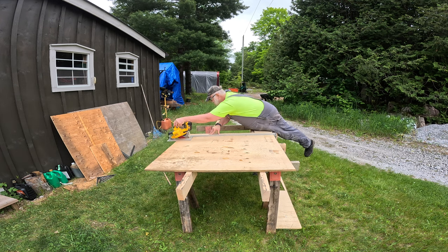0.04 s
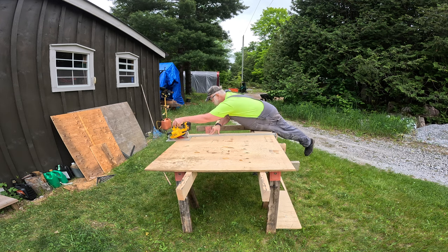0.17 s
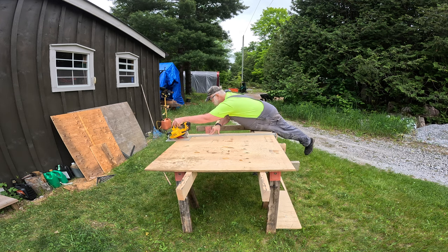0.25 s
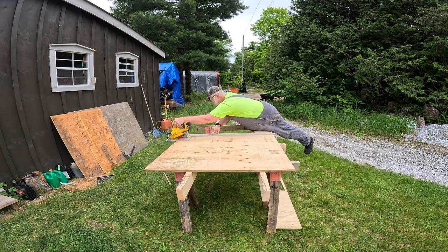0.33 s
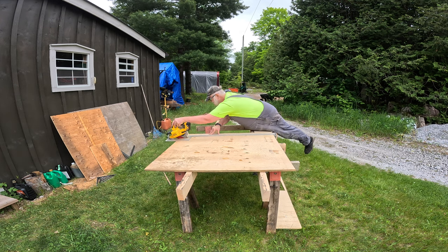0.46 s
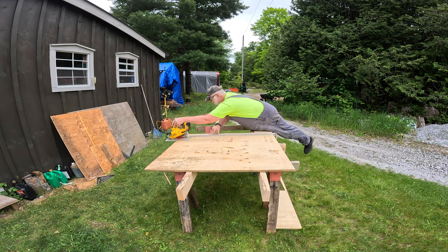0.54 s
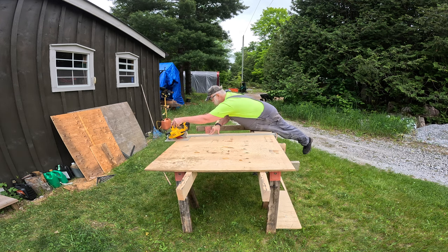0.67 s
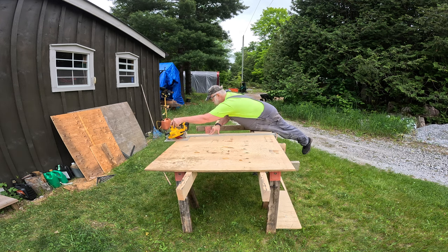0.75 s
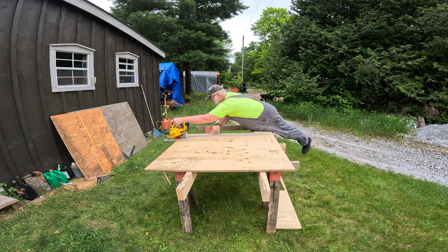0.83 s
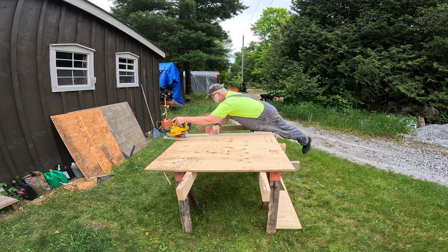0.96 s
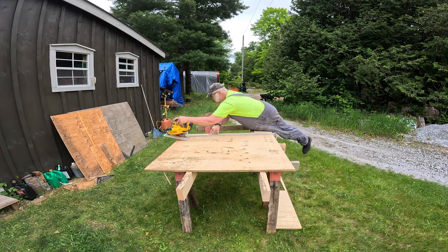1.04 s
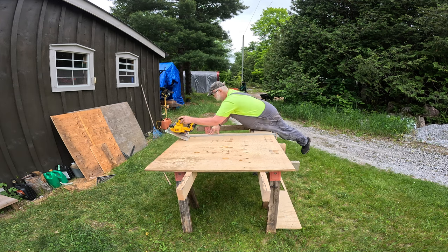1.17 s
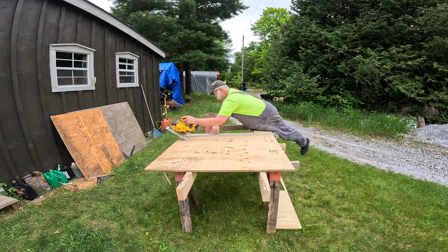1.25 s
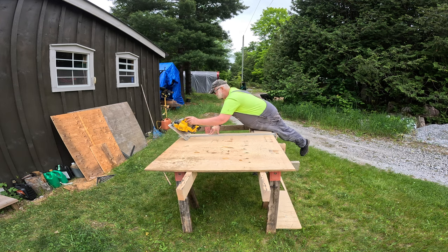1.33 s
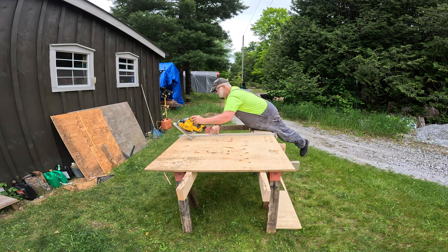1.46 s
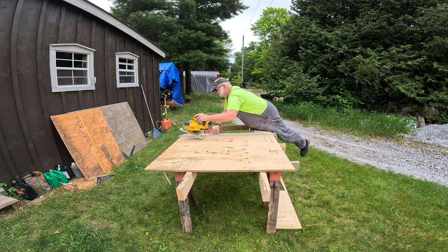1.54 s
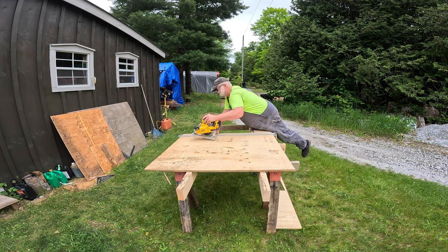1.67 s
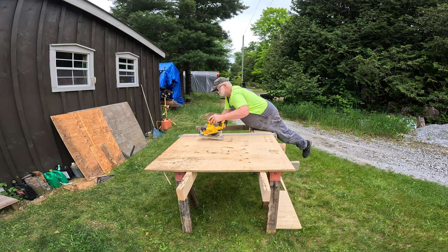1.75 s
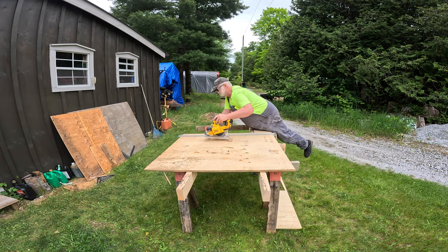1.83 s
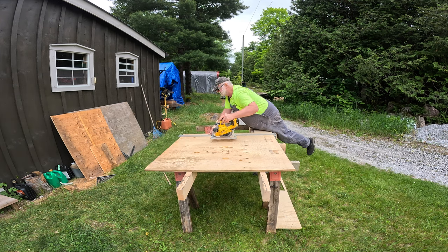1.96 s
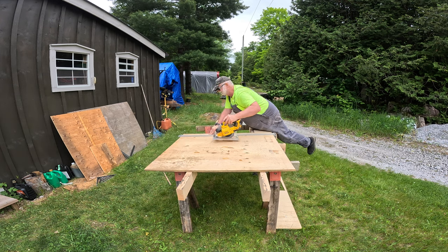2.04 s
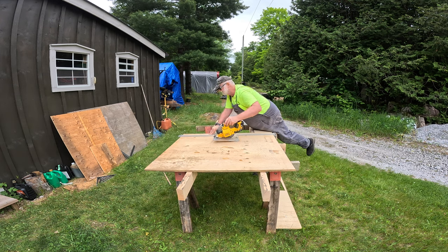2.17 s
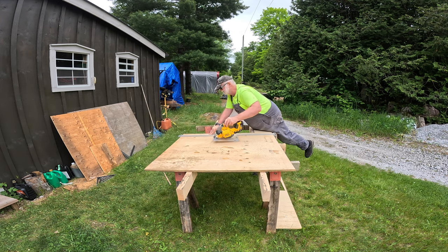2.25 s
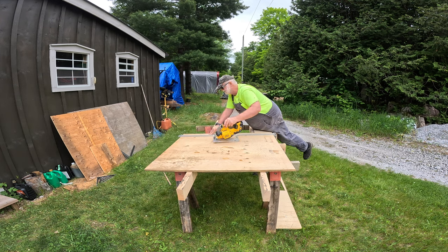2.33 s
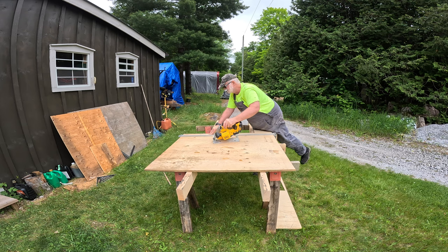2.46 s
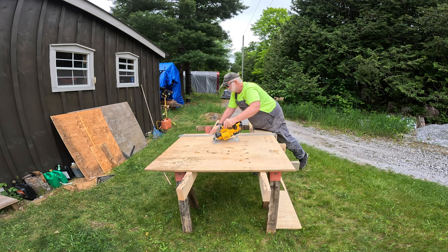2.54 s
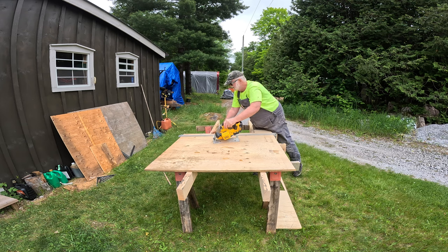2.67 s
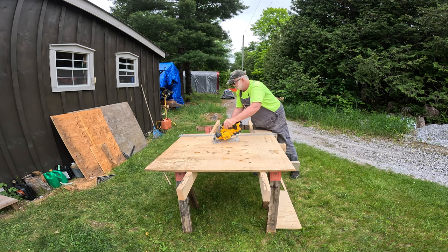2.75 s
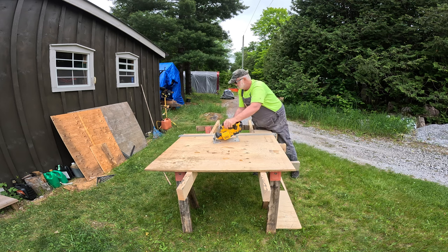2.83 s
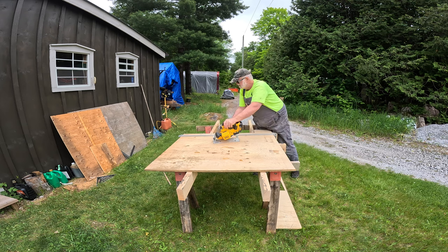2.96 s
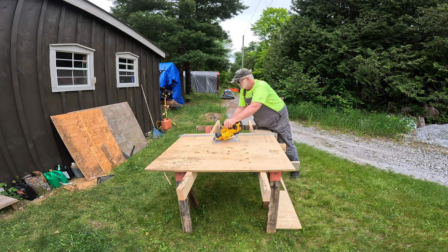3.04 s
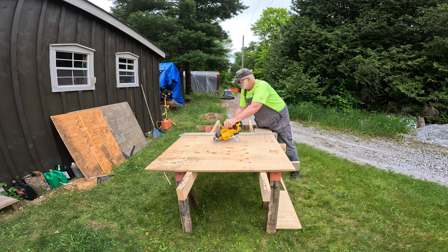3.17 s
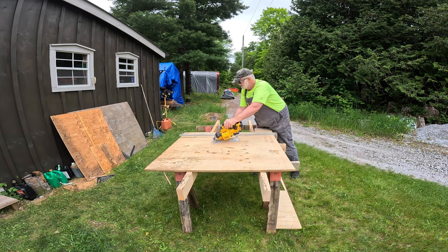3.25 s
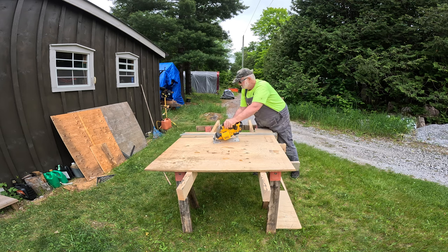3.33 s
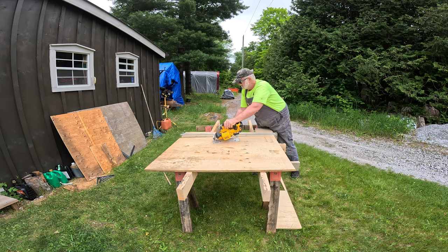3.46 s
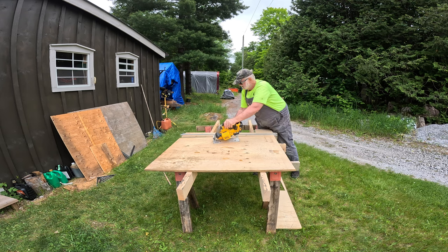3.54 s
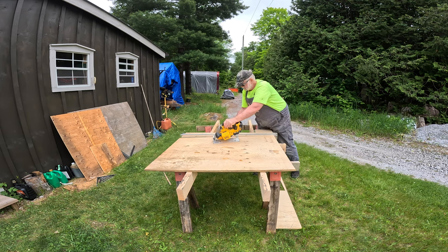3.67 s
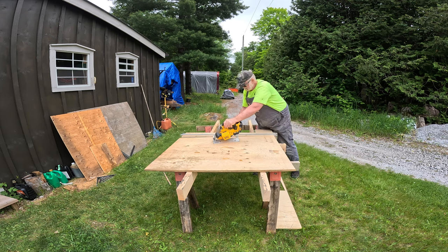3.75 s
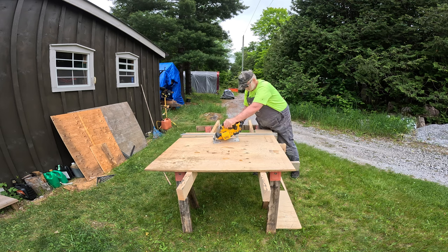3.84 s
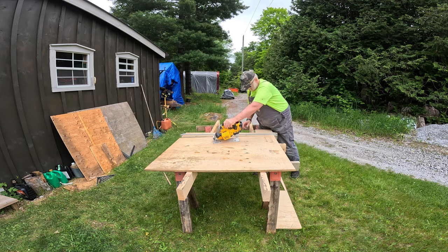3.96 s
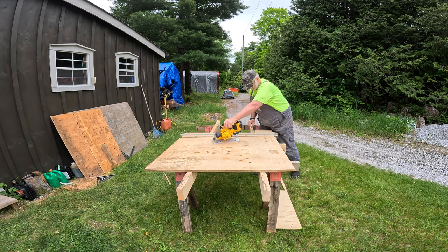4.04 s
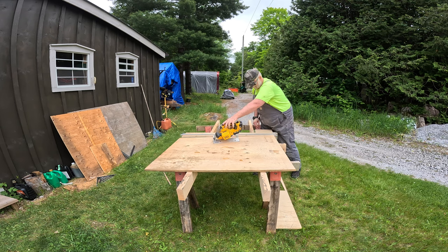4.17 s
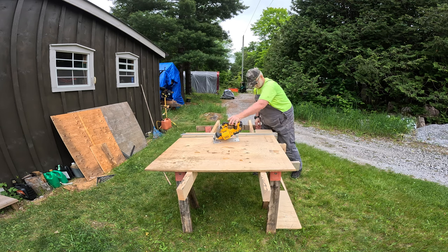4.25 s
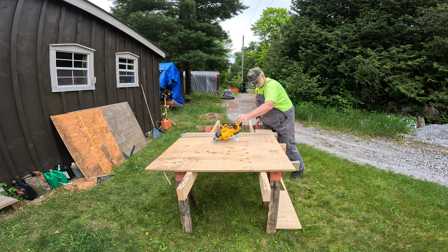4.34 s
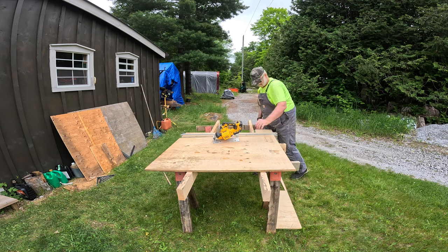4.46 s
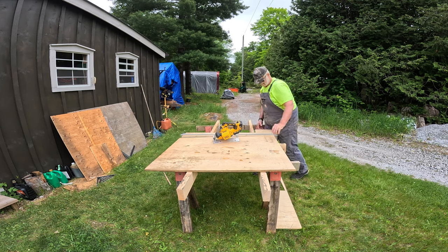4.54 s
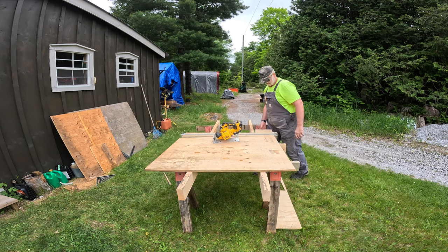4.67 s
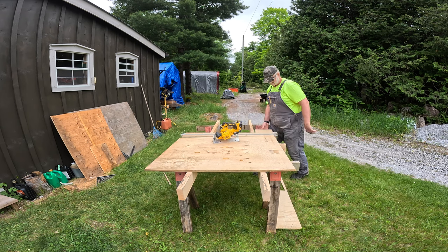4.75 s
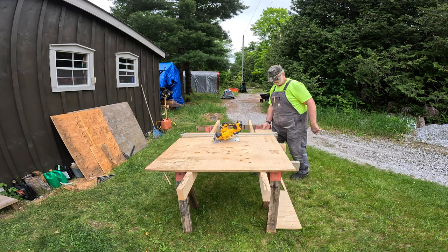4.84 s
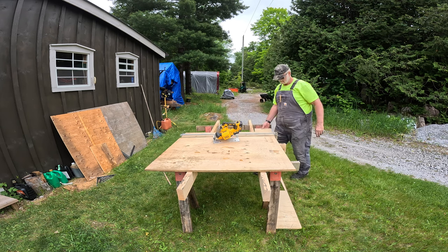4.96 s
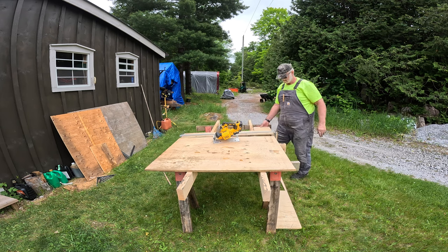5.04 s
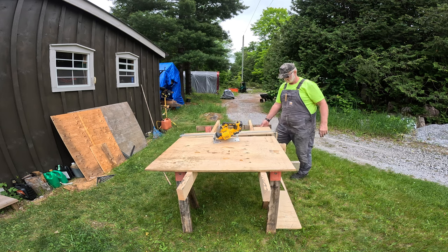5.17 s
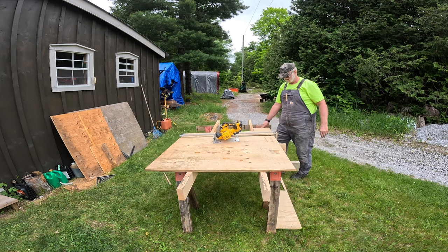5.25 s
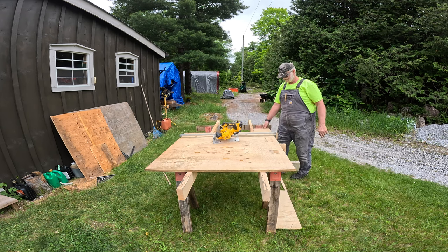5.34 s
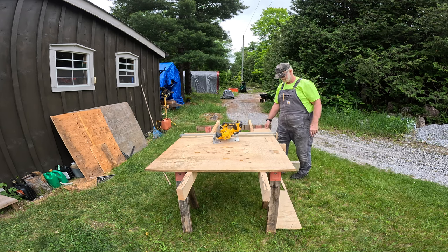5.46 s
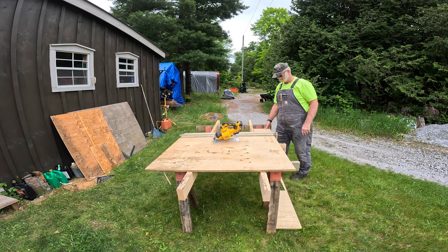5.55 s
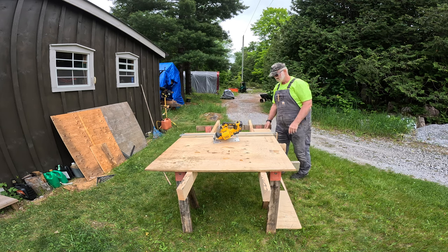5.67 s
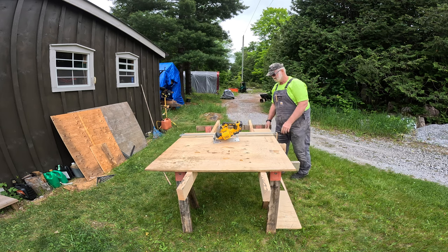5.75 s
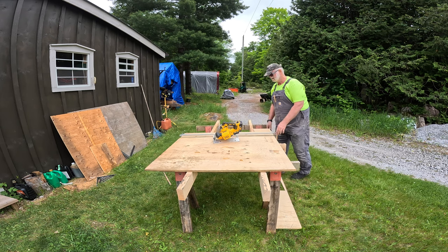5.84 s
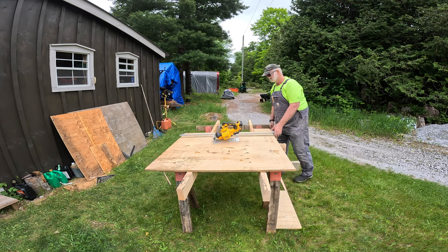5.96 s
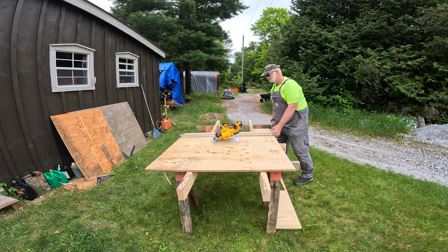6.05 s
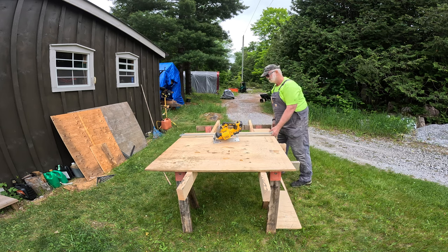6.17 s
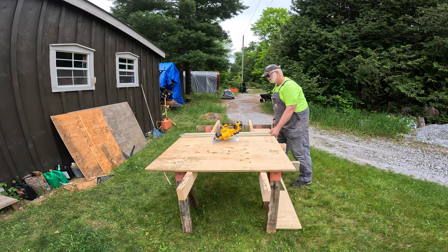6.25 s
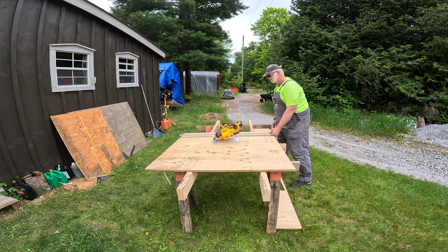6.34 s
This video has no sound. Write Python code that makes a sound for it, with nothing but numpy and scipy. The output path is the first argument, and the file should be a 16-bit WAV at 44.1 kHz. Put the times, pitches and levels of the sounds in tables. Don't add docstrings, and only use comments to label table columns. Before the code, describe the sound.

Outdoors, a power saw winds down within a second, followed by taps, scrapes and thumps on a wooden sheet, a brief bird call and falling wood.

```python
import sys
import numpy as np
from scipy import signal
from scipy.fft import rfft, irfft
from scipy.io import wavfile
from scipy.ndimage import uniform_filter1d

SR = 44100
rng = np.random.default_rng(int(sys.argv[2]) if len(sys.argv) > 2 else 0)


def to_wav(s):
    ch = np.atleast_2d(s).T
    pcm = np.round(np.clip(ch, -1, 1) * 32767)
    wavfile.write(sys.argv[1], SR, pcm.astype(np.int16))


def convert_level_to_amplitude(level_db):
    exponent = np.asarray(level_db, float) / 20
    return 10 ** exponent


N = 282240

# (frequency [Hz], density [dB per Hz])
HISS = [(180, -18), (300, -8), (886, -4), (1020, 1), (1360, -1.5), (1490, -3), (2870, -6.5), (3950, -11.5),
        (5280, -12.5), (7280, -15), (9430, -22.5), (11500, -37), (15000, -66.5), (22000, -120)]
# (time [s], level [dB])
WIND = [(0, -60), (.5, -59), (.9, -62), (1.2, -52), (1.6, -48.5), (1.9, -47.5), (2.15, -60.5), (2.3, -47),
        (2.8, -50), (3.4, -52), (3.75, -46), (4.2, -50.5), (4.65, -53), (5.0, -48.5), (5.3, -61.5),
        (5.52, -52), (5.75, -63.5), (6.4, -61.5)]
# (delay [s], left level [dB], right level [dB])
ECHOES = [
    (.009, -15, -9),
    (0.022, -12, -18.5),
    (0.041, -26, -19.5),
]
# (frequency [Hz], left minus right [dB])
LEFT_MORE = [(60, -.1), (130, -.4), (250, -.7), (600, -1.5), (1400, -.7), (2800, .1), (6000, .1),
             (9500, 2.2), (13000, 4.5)]
# (frequency [Hz], left lead [rad])
LEFT_LEAD = [(100, 0), (350, -.06), (700, -.2), (1400, -0.16), (2800, -.28), (4600, -0.09), (9000, .15)]

# (time [s], pitch [Hz], level [dB])
NOTES = [
    [(3.715, 4270, -70), (3.752, 4230, -68), (3.762, 4190, -61), (3.78, 4430, -59), (3.814, 4540, -61),
     (3.83, 4720, -57), (3.848, 4940, -60), (3.857, 4950, -72)],
    [(3.864, 4960, -64), (3.875, 5030, -59), (3.895, 4930, -61), (3.915, 4680, -61), (3.935, 4100, -63),
     (3.955, 3600, -62), (3.968, 3440, -66)],
    [(3.965, 3420, -65), (4.0, 3420, -66), (4.03, 3520, -65), (4.058, 3540, -66), (4.07, 3700, -69),
     (4.125, 3720, -68)],
    [(3.9, 4950, -68), (3.94, 4940, -63), (3.975, 4850, -70), (4.02, 4850, -76)],
    [(4.188, 3650, -70), (4.198, 3633, -61), (4.228, 3616, -63), (4.238, 3620, -70)],
    [(5.96, 4170, -76), (5.968, 4165, -68), (6.0, 4160, -72), (6.03, 4160, -80), (6.066, 4150, -80),
     (6.076, 4167, -73), (6.105, 4160, -82), (6.15, 4185, -78), (6.165, 4180, -86)],
]
OCTAVE_DB = [-40, -40, -31, -40, -5, -40]
# (time [s], centre [Hz], level [dB])
BUZZ = [
    (3.95, 4200, -72),
    (4.02, 4500, -61),
    (4.07, 4800, -57),
    (4.12, 4500, -59),
    (4.16, 4500, -72),
]

# (frequency [Hz], level [dB], decay t60 [s])
EDGES = [(3630, 9, 0.0019), (4180, 7.5, 0.0025), (4850, 5.5, 0.0043), (5420, 3.5, 0.0064),
         (5930, -4.5, 0.0063)]
# (frequency [Hz], level [dB], decay t60 [s])
SHEET = [(90, -2, 0.75), (115.4, -2, 0.35), (168.7, 12.5, 0.08), (210.6, 8.5, 0.089), (249, 1.5, 0.14),
         (278.5, 2.5, 0.15)]
# (frequency [Hz], level [dB], decay t60 [s])
BODY = [(497, -54, 0.041), (578, 3.5, 0.028), (721, 4.5, 0.038), (813, 5, 0.015), (960, -20, 0.019),
        (1010, 9, 0.015), (1133, 9, 0.013), (1402, 13.5, 0.0079), (1690, 16.5, 0.0073), (1974, 9.5, 0.011),
        (2308, 3.5, 0.031), (2640, 2.5, 0.03), (3030, 3.5, 0.045)]
# (start [s], length [s], rub [dB], rumble [dB], hiss [dB])
SLIDES = [(0.96, 0.14, -58.5, -69, -76), (1.15, 0.036, -48.5, -39.5, -66), (1.753, 0.078, -42.5, -38, -50),
          (1.889, 0.23, -38, -27, -57), (2.678, 0.11, -48, -49, -63), (2.847, 0.099, -48.5, -43, -73),
          (2.986, 0.204, -55, -65, -84), (3.195, 0.12, -61, -74, -71), (3.61, 0.037, -43, -41, -54.5),
          (5.165, 0.58, -48.5, -46.5, -64), (5.771, 0.05, -72.5, -86, -66), (6.216, 0.083, -70, -67, -74)]
# (time [s], centre [Hz], level [dB])
SCRAPE = [(1.81, 5075, -75), (1.82, 4656, -45), (1.845, 5230, -52), (1.865, 5360, -87), (1.89, 5000, -56),
          (1.935, 5190, -46.5), (1.975, 4800, -48), (2.01, 4510, -52), (2.03, 5140, -53), (2.06, 5200, -57),
          (2.11, 5200, -58.5), (2.135, 5200, -71)]
# (time [s], level [dB], decay t60 [s])
SPIT = [(.66, -62, 0.037), (0.901, -62, .06), (1.011, -56.5, 0.052), (1.271, -59.5, 0.11),
        (1.411, -58, .08), (1.767, -48.5, 0.18), (2.151, -64, .05), (2.178, -58, .04), (2.187, -57, .04),
        (2.205, -48, .06), (2.247, -43.5, 0.043), (2.288, -65, .05), (2.538, -62.5, .05),
        (2.702, -58, 0.17), (2.877, -55.5, .12), (3.629, -56, .15), (3.668, -47.5, 0.045),
        (3.689, -50, 0.096), (5.122, -53.5, 0.13), (5.147, -61, .06), (5.183, -64.5, .06),
        (5.222, -59.5, .06), (5.288, -57, .06), (5.345, -62.5, 0.059), (5.397, -48, 0.061),
        (5.465, -66, .05), (1.89, -70, 0.56), (5.16, -71, .9), (5.3, -68.5, 0.36), (5.41, -66, 0.29),
        (2.21, -62, 0.2)]
# (time [s], peak [dB], centre [Hz],
# crack [dB])
TAPS = [(0.659, -25, 1040, -44), (0.9, -33, 1980, -59), (0.912, -35.5, 1140, -44), (1.011, -31, 1380, -70),
        (1.036, -40, 980, -44.5), (1.098, -37, 1170, -81), (1.176, -31.5, 1740, -58),
        (1.27, -12.5, 1210, -45.5), (1.315, -24.5, 950, -82), (1.41, -20, 1030, -64),
        (1.429, -23, 1410, -62), (1.467, -35, 1400, -64), (1.63, -41, 1200, -74), (1.673, -28, 1630, -40),
        (1.818, -17, 1010, -39), (1.9, -24, 2060, -57), (1.936, -14, 930, -50), (2.15, -30.5, 1771, -46.5),
        (2.177, -30, 2600, -46), (2.183, -26, 1390, -44), (2.441, -40, 2400, -54), (2.412, -46, 2800, -56),
        (2.247, -30, 2600, -50), (1.766, -30, 2600, -48), (1.969, -30, 2000, -40), (4.268, -47, 2000, -56),
        (2.555, -40, 2400, -54), (2.699, -35, 1420, -49.5), (2.875, -32, 1180, -50),
        (3.297, -37, 2010, -51.5), (3.564, -36.5, 1110, -66), (4.119, -36.5, 2170, -50),
        (4.243, -32, 1900, -55), (6.238, -43, 1106, -68), (4.568, -39, 1020, -56.5),
        (3.629, -31, 1270, -54), (3.667, -11, 1350, -45)]
# (time [s], peak [dB], sheet thump [dB], crack [dB], rattle t60 [s])
LANDINGS = [(1.217, -40, -59, -55.5, 0.074), (1.505, -29.5, -45, -52, 0.1), (1.541, -36, -46, -57, 0.049),
            (1.837, -22, -32, -70, 0.089), (2.197, -14, -26, -35.5, 0.29), (2.204, -10, -24, -66, 0.04),
            (2.213, -38, -17, -53, 0.079), (2.247, -61, -33, -39.5, 0.12), (2.289, -64, -29.5, -55, 0.35),
            (2.539, -27.5, -27.5, -54, 0.16), (3.488, -21.5, -26.5, -29.5, 0.084),
            (3.664, -15.5, -16.5, -31.5, 0.19), (3.686, -26, -22.5, -26, 0.091)]
# (time [s], peak [dB], sheet thump [dB], crack [dB], rattle t60 [s])
OFFCUT = [(5.12, -7, -26, -36.5, 0.11), (5.147, -16, -19, -43, 0.057), (5.182, -22, -36, -47, 0.15),
          (5.221, -45, -34, -46.5, 0.12), (5.285, -25.5, -20.5, -47.5, 0.11),
          (5.328, -22.5, -18.5, -54.5, 0.13), (5.343, -38, -45, -47, 0.14),
          (5.371, -21.5, -21.5, -53, 0.41), (5.396, -13, -24, -35, 0.16), (5.411, -4, -21, -38, 0.051),
          (5.446, -6, -30, -78, 0.095), (5.467, -23.5, -20, -62, 0.13), (5.489, -31, -27, -64, 0.1),
          (5.552, -40, -32.5, -68, 0.3)]
# (time [s], frequency [Hz], peak [dB], decay t60 [s])
RINGS = [(1.272, 911, -31.5, .12), (1.272, 1430, -28, 0.06), (1.273, 1705, -39, 0.097),
         (1.413, 940, -31.5, 0.086), (1.41, 1450, -34, 0.07), (2.2, 660, -31, 0.086),
         (2.201, 1170, -24, .05), (2.2145, 255, -16, 0.085), (2.542, 2393, -48.5, 0.1),
         (3.491, 1604, -38.5, 0.11), (3.666, 81.7, -22, 0.28), (3.668, 573, -28.5, 0.092),
         (3.668, 443, -31.5, 0.19), (3.668, 763, -29.5, 0.083), (3.668, 1278, -16.5, 0.047),
         (3.668, 1850, -42, 0.073), (3.69, 115, -22, 0.24), (3.69, 512, -28, 0.13),
         (3.628, 1230, -40, 0.13), (3.64, 2050, -40, .1), (3.715, 170, -27, 0.24), (3.668, 2250, -35, .08),
         (3.69, 1500, -38, .08), (5.412, 1500, -28, 0.068), (5.42, 520, -27, 0.06), (5.45, 1600, -29, .08),
         (2.21, 205, -25, 0.12), (.66, 960, -43, .12), (1.043, 2850, -58, .25), (1.543, 650, -41, 0.12),
         (1.509, 2540, -46, 0.04), (1.51, 1426, -52, 0.15), (1.292, 1370, -36, .08),
         (5.405, 272, -23, 0.06), (1.632, 2280, -49, 0.046), (5.121, 229, -30.5, .15),
         (5.122, 510, -28, 0.12), (5.122, 889, -25, 0.2), (5.12, 1055, -31, 0.19),
         (5.121, 1220, -25.5, 0.12), (5.122, 3120, -29, 0.037), (5.399, 82, -31, 0.26),
         (5.4, 312, -36, 0.077), (5.4, 650, -22, 0.067), (5.412, 515, -23, 0.11),
         (5.447, 853, -20.5, 0.064), (5.449, 1230, -29, 0.089), (5.448, 102.3, -22.5, 0.21),
         (6.237, 1100, -60.5, .3), (6.288, 1054, -60.5, 0.27),
         (5.396, 112, -18, .11), (5.3977, 272, -19, .09), (2.18, 230, -33, .07),
              (2.298, 120, -33, .08), (5.41, 1400, -27, .05), (5.447, 535, -22, .07),
              (5.448, 1050, -24, .05), (5.485, 560, -30, .08), (5.565, 120, -33, .15),
              (5.998, 2480, -66, .3), (3.488, 4400, -40, .03), (3.74, 240, -34, .14),
              (6.235, 1250, -61, .2)]

# (time [s], speed [turns per s])
SPIN = [
    (0, 65),
    (.3, 64.75),
    (.33, 61),
    (.37, 52),
    (.4, 47.2),
    (.44, 44),
    (.49, 37),
    (.52, 30),
    (.62, 12),
]
# (time [s], level [dB])
CUT = [
    (0.0, -21.5),
    (0.09, -21),
    (0.2, -24),
    (0.374, -25),
    (0.47, -23.5),
    (0.51, -28.5),
    (0.598, -37),
    (0.615, -59),
    (0.65, -59),
]
# (frequency [Hz], density [dB per Hz])
CUT_COLOUR = [(150, -24.5), (300, -14), (600, -7.5), (900, 0), (1300, -2.5), (2000, -3), (2700, -1),
              (3300, -3.5), (5000, -8.5), (8500, -8), (11000, -18.5), (15000, -43)]
# (frequency [Hz], width [Hz], level [dB])
BLADE = [(285, 60, -14), (770, 60, -6), (970, 14, -6), (1045, 20, -3), (1240, 50, -8), (1780, 30, -11),
         (2190, 40, -10), (2490, 50, -3), (2683, 25, 1), (2850, 60, -5), (2915, 36, 8.5), (2990, 70, -1),
         (3250, 200, -9), (3706, 25, -9), (4065, 50, -9), (4650, 50, -11), (5750, 250, -7),
         (7300, 300, -12), (8700, 400, -11)]
ORDERS_HEARD = [8, 13, 15, 16, 18, 21, 38, 43, 45]
ORDER_DB = [-44, -38, -34, -33, -40, -35, -36, -37, -31]
# (multiple, level [dB])
SIDE_ORDERS = [(39, -37), (44, -36), (45, -33), (46, -44), (57, -38), (62.5, -41), (71.5, -41), (29, -39),
               (18, -39)]
# (multiple, housing resonance [Hz], level there [dB])
MOTOR_GLIDES = [(48, 2620, -22), (72, 2200, -29), (24, 1000, -28), (13, 620, -35), (30, 850, -30),
                (5, 230, -42)]
# (time [s], pitch [Hz], level [dB])
HUM = [
    (.32, 302.5, -54.5),
    (.36, 291, -43),
    (.47, 265, -48),
    (.58, 253, -49.5),
    (.62, 242, -56),
]

FULL_TURNS = 65


def rms_one(x):
    return x / np.sqrt(np.mean(x ** 2) + 1e-20)


def peak_one(x):
    return x / np.max(np.abs(x))


def in_time(rows):
    s, *columns = np.transpose(rows)
    return [np.interp(np.arange(N) / SR, s, c) for c in columns]


def while_on(rows, fade_s):
    t = np.arange(N) / SR
    return np.clip(np.minimum(t - rows[0][0] + fade_s, rows[-1][0] + fade_s - t) / fade_s, 0, 1)


def from_time(s, length):
    start = round(s * SR)
    end = min(start + length, N)
    return slice(start, end), np.arange(end - start) / SR


def at_hz(points, hz):
    point_hz, value = np.transpose(points)
    return np.interp(np.log(hz + 1), np.log(point_hz), value)


def bandpass(x, low_hz, high_hz, order):
    return signal.sosfilt(signal.butter(order, [low_hz, high_hz], "band", fs=SR, output="sos"), x)


def band(x, low_hz, high_hz, order=2):
    return rms_one(bandpass(x, low_hz, high_hz, order))


def coloured(x, points):
    hz = np.arange(N // 2 + 1) * SR / N
    return rms_one(irfft(rfft(x) * convert_level_to_amplitude(at_hz(points, hz)), N))


def thirds(x, low_hz, high_hz):
    hz = np.arange(N // 2 + 1) * SR / N + 1
    low = 1 / (1 + (hz / low_hz) ** 6)
    high = 1 / (1 + (high_hz / hz) ** 6)
    return [rms_one(irfft(rfft(x) * part, N)) for part in (low, 1 - low - high, high)]


def drift(rate_hz):
    r = np.exp(-32 * np.pi * rate_hz / SR)
    settle = 3000
    noise = rng.standard_normal(N // 16 + settle + 2)
    slow = signal.lfilter([1], [1, -2 * r, r * r], noise)[settle:]
    return np.interp(np.arange(N) / 16, np.arange(len(slow)), rms_one(slow))


def grit(per_s, spread_db):
    clicks = rng.random(N) < per_s / SR
    size = convert_level_to_amplitude(spread_db * np.minimum(rng.exponential(1, N), 4))
    return rms_one(clicks * size * rng.choice([-1, 1], N))


def modes(x, table):
    out = 0
    for hz, db, t60 in table:
        r = convert_level_to_amplitude(-60 / (np.clip(t60, .005, .3) * SR))
        w = 2 * np.pi * hz / SR
        out = out + convert_level_to_amplitude(db) * signal.lfilter([0, np.sin(w)], [1, -2 * r * np.cos(w), r * r], x + 1e-18)
    return out


def ducking(loud):
    above_db, share, recover_db_per_s, slowness_s = -32, 0.45, 25, .15
    over_db = np.maximum(10 * np.log10(uniform_filter1d(loud ** 2, 1024) + 1e-12) - above_db, 0)
    ramp_db = recover_db_per_s * np.arange(N) / SR
    held_db = np.maximum.accumulate(over_db + ramp_db) - ramp_db
    keep = np.exp(-1 / (slowness_s * SR))
    return convert_level_to_amplitude(-share * signal.lfilter([1 - keep], [1, -keep], held_db))


def air(duck):
    wind_db, = in_time(WIND)
    gust_db = uniform_filter1d(wind_db - wind_db.mean(), int(0.33 * SR))
    hiss_db = -62.5 + 0.31 * gust_db
    rumble_db = -62 + 0.5 * gust_db
    mid, side = [coloured(rng.standard_normal(N), HISS) for _ in range(2)]
    hiss = convert_level_to_amplitude(hiss_db + 1.6 * drift(8)) * (mid + 0.08 * side * [[1], [-1]])
    wind = convert_level_to_amplitude(wind_db) * band(rng.standard_normal(N), 32, 55.8)
    rumble = convert_level_to_amplitude(rumble_db + 2.5 * drift(6)) * band(rng.standard_normal(N), 65, 220, order=3)
    gusts = wind + .04 * np.roll(wind, 700) * [[1], [-1]]
    return duck * hiss + gusts + rumble


def treeline():
    level_db, t60_s, build_s = -68.5, 1.3, .08
    t = np.arange(SR) / SR
    tail = rng.standard_normal(SR) * convert_level_to_amplitude(level_db - 60 * t / t60_s) * np.minimum(t / build_s, 1)
    wash = convert_level_to_amplitude(in_time(CUT)[0]) * while_on(CUT, .008) * band(rng.standard_normal(N), 1100, 5500)
    return signal.fftconvolve(wash, tail)[:N]


def bird():
    song = np.zeros(N)
    for note, octave_db in zip(NOTES, OCTAVE_DB):
        hz, db = in_time(note)
        angle = 2 * np.pi * np.cumsum(hz * (1 + .012 * drift(200))) / SR
        voice = np.sin(angle) + convert_level_to_amplitude(octave_db) * np.sin(2 * angle)
        song += np.sqrt(2) * convert_level_to_amplitude(db + 1.8 * drift(80)) * while_on(note, 0.004) * voice
    hz, db = in_time(BUZZ)
    buzz = band(rng.standard_normal(N), 60, 1300) * np.sin(2 * np.pi * np.cumsum(hz) / SR)
    song += convert_level_to_amplitude(db) * while_on(BUZZ, 0.011) * buzz
    t = np.arange(SR // 4) / SR
    leaves = rng.standard_normal(SR // 4) * convert_level_to_amplitude(-60 * t / 0.15)
    return song + convert_level_to_amplitude(-29.5) * signal.fftconvolve(song, leaves)[:N]


def spit():
    fine = band(grit(6000, 2.1), 5500, 9800, order=3)
    shape = np.zeros(N)
    for s, db, t60 in SPIT:
        here, t = from_time(s, SR // 4)
        shape[here] += convert_level_to_amplitude(db - 60 * t / max(t60, .02)) * np.minimum(t / .006, 1)
    return shape * fine


def scrape():
    hz, db = in_time(SCRAPE)
    clumps = band(grit(3000, 2.1), 30, 460) * convert_level_to_amplitude(2.6 * drift(41))
    return np.sqrt(2) * convert_level_to_amplitude(db) * while_on(SCRAPE, .01) * clumps * np.sin(2 * np.pi * np.cumsum(hz) / SR)


def snap(contact):
    return band(modes(contact, EDGES), 2000, 7660) + .3 * band(contact, 3600, 8400)


def stroke(start_s, length_s, attack_s):
    release_s, sag_db_per_s = 0.029, 51.5
    t = np.arange(N) / SR - start_s
    shape = np.clip(np.minimum(t / attack_s, 1 + (length_s - t) / release_s), 0, 1)
    return shape * convert_level_to_amplitude(-sag_db_per_s * np.clip(t, 0, length_s))


def slides():
    rub, rumble, hiss = np.zeros((3, N))
    for start_s, length_s, rub_db, rumble_db, hiss_db in SLIDES:
        quick = stroke(start_s, length_s, attack_s=0.023)
        rub += convert_level_to_amplitude(rub_db) * quick
        rumble += convert_level_to_amplitude(rumble_db) * stroke(start_s, length_s, attack_s=0.074)
        hiss += convert_level_to_amplitude(hiss_db) * quick
    contact = grit(2500, 4) * convert_level_to_amplitude(2.8 * drift(38))
    base = .6 * rms_one(modes(contact, BODY)) + .8 * band(contact, 500, 3200)
    sheet = rms_one(modes(band(contact, 109, 660), SHEET))
    return rub * base + rumble * sheet + hiss * convert_level_to_amplitude(2.0 * drift(45)) * snap(contact)


def all_blows():
    rows = [(s, db, hz, db - 19, crack_db, 0.14) for s, db, hz, crack_db in TAPS]
    for table, top_hz in ((LANDINGS, 904), (OFFCUT, 623)):
        rows += [(s, db, top_hz + 9.5 * db, *rest) for s, db, *rest in table]
    return rows


def blows():
    contact, out = grit(2500, 2.73), np.zeros(N)
    soft, bright = band(contact, 100, 486), snap(contact)
    for s, db, centre_hz, thump_db, crack_db, t60 in all_blows():
        here, t = from_time(s, SR // 4)
        t60 = max(t60, .02)
        narrow_db = np.clip(6.5 - 0.083 * (db + 13), 1, 12)
        near = [(hz, mode_db - narrow_db * np.log2(hz / centre_hz) ** 2, ring) for hz, mode_db, ring in BODY]
        rattle = contact[here] * convert_level_to_amplitude(-60 * t / t60) * np.minimum(t / 0.00053, 1)
        rattle[round(.001 * SR)] += 1.66
        knock = peak_one(band(modes(rattle, near), centre_hz * 0.47, centre_hz * 4.4))
        knock += 0.04 * peak_one(band(rattle, centre_hz / 2, centre_hz * 1.13))
        push = soft[here] * convert_level_to_amplitude(-90 * t / t60) * np.minimum(t / 0.0022, 1)
        thump = modes(push, SHEET)
        crack = peak_one(bright[here] * convert_level_to_amplitude(-190 * t / t60) * np.minimum(t / 0.0039, 1))
        crack += 0.06 * peak_one(modes(1. * (t == 0), EDGES[2:3]))
        blow = convert_level_to_amplitude(db - 9.0) * knock
        blow += convert_level_to_amplitude(thump_db - 2.5) * peak_one(thump)
        blow += convert_level_to_amplitude(crack_db + 6.5) * peak_one(crack)
        out[here] += np.minimum((t[-1] - t) / .05, 1) * blow
    return out


def rings():
    out = np.zeros(N)
    for s, hz, db, t60 in RINGS:
        here, t = from_time(s, SR // 3)
        decay = convert_level_to_amplitude(db - 60 * t / max(t60, .02)) * np.minimum(t / 0.0012, 1)
        out[here] += decay * np.sin(2 * np.pi * hz * t)
    return out


def cut_parts():
    turns, level_db = in_time(SPIN)[0], in_time(CUT)[0]
    octaves_slower = np.log2(FULL_TURNS / turns)
    return turns, level_db, -8.5 + 7 * octaves_slower, -3.5 - 2 * octaves_slower


def crossing(hz, peak_hz, top_db, below_db, above_db):
    octaves = np.log2(hz / peak_hz)
    return top_db - np.maximum(above_db * octaves, -below_db * octaves)


def dust():
    _, level_db, _, bright_db = cut_parts()
    ears = np.array([band(rng.standard_normal(N), 10500, 14000, order=3) for _ in range(2)])
    return convert_level_to_amplitude(level_db + bright_db - 29.5) * while_on(CUT, 0.0061) * ears


def hum():
    hz, db = in_time(HUM)
    return convert_level_to_amplitude(db) * while_on(HUM, .01) * np.sin(2 * np.pi * np.cumsum(hz) / SR)


def whine():
    turns, level_db, _, _ = cut_parts()
    angle, waver = 2 * np.pi * np.cumsum(turns) / SR, drift(18)
    tones = np.zeros(N)
    for n, (k, db) in enumerate(SIDE_ORDERS):
        tones += convert_level_to_amplitude(db + 4 * np.roll(waver, 9001 * n)) * np.sin(k * angle + n)
    return tones * convert_level_to_amplitude(level_db + 21) * (turns / FULL_TURNS) ** 5 * while_on(CUT, .008)


def cutting_noise(angle, low_db, bright_db):
    teeth = rng.standard_normal(N) * (1 + 0.1 * np.cos(angle))
    teeth = teeth * convert_level_to_amplitude(1.3 * band(np.roll(teeth, SR), 30, 600))
    load, flutter = drift(5.4), drift(8.6)
    ringing = np.zeros(N)
    for n, (hz, width_hz, db) in enumerate(BLADE):
        mode = (hz, db + 10 * np.log10(width_hz), np.log(1000) / np.pi / width_hz)
        swell = convert_level_to_amplitude(2.2 * np.roll(flutter, 12007 * (n + 1)))
        ringing += swell * modes(np.roll(teeth, 679 * n), [mode])
    noise = coloured(teeth[::-1], CUT_COLOUR) + .62 * band(ringing, 230, 10000)
    low, middle, bright = thirds(noise, 1500, 4000)
    return middle + convert_level_to_amplitude(low_db + 0.73 * load) * low + convert_level_to_amplitude(bright_db + 1.3 * flutter) * bright


def motor_tones(angle, turns, level_db):
    gear, groan = 42, 18
    gear_db = crossing(gear * turns, peak_hz=2169, top_db=-20.5, below_db=54, above_db=22.5)
    gear_db -= 7 * np.clip(turns - FULL_TURNS + 1, 0, 1)
    groan_db = crossing(groan * turns, peak_hz=600, top_db=-36, below_db=12, above_db=25)
    mesh = np.sin(gear * angle + .15 * np.sin(angle) + .08 * drift(80))
    tones = convert_level_to_amplitude(gear_db + 1 + 1.5 * drift(40)) * mesh
    tones += convert_level_to_amplitude(groan_db + 3 * drift(40)) * np.sin(groan * angle)
    for k, db in zip(ORDERS_HEARD, ORDER_DB):
        level = convert_level_to_amplitude(db + level_db + 21 + 4 * drift(25)) * (turns / FULL_TURNS) ** 4
        tones += level * np.sin(k * angle + rng.uniform(0, 2 * np.pi))
    for k, hz, db in MOTOR_GLIDES:
        passing_db = crossing(k * turns, hz, db, below_db=45, above_db=45)
        passing_db -= 12 * np.clip(turns - FULL_TURNS + 1.5, 0, 1)
        tones += convert_level_to_amplitude(passing_db + 4 * np.sin(angle / 2)) * np.sin(k * angle)
    return tones


def saw():
    turns, level_db, low_db, bright_db = cut_parts()
    angle = 2 * np.pi * np.cumsum(turns * (1 + .0008 * drift(30))) / SR
    cut = convert_level_to_amplitude(level_db - 2.0) * cutting_noise(angle, low_db, bright_db)
    return (cut + motor_tones(angle, turns, level_db)) * while_on(CUT, 0.008)


def outdoors(x):
    out, dull = np.array([x, x]), bandpass(x, 400, 3000, order=1)
    for lag_s, left_db, right_db in ECHOES:
        lag = round(lag_s * SR)
        out[:, lag:] += convert_level_to_amplitude(np.array([[left_db], [right_db]])) * dull[:-lag]
    t = np.arange(SR // 2) / SR
    trees = rng.standard_normal(len(t)) * convert_level_to_amplitude(-52.5 - 60 * t / 0.39) * np.minimum(t / 0.03, 1)
    return out + signal.fftconvolve(dull, trees)[:N]


def scene():
    handling = bandpass(blows() + slides() + rings(), 60, 9500, order=3)
    near = saw() + hum() + handling
    background = air(ducking(near)) + treeline()
    return outdoors(near + bird() + spit() + scrape()) + dust() + background + whine()


def band_limit(x):
    return signal.sosfilt(signal.butter(12, 15040, fs=SR, output="sos"), x)


def record(dry):
    hz = np.arange(N // 2 + 1) * SR / N
    port = convert_level_to_amplitude(at_hz(LEFT_MORE, hz) / 2) * np.exp(.5j * at_hz(LEFT_LEAD, hz))
    mix = irfft(rfft(dry) * np.array([port, 1 / port]), N)
    return band_limit(mix)


dry = scene()
out = record(dry)
to_wav(out)
```